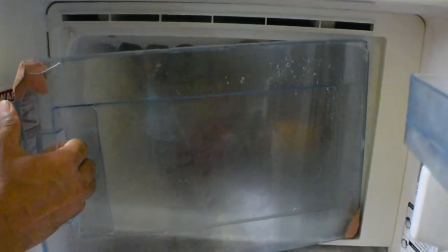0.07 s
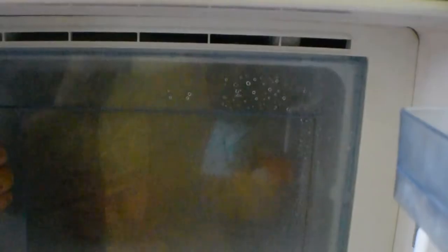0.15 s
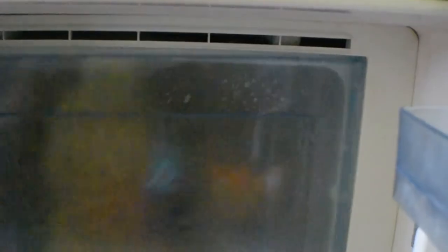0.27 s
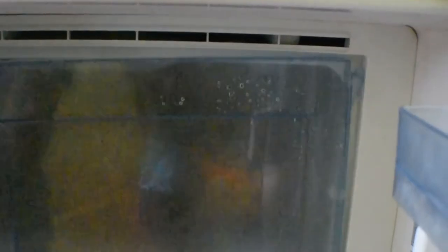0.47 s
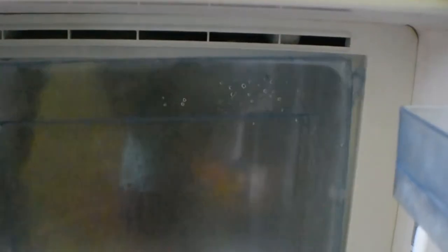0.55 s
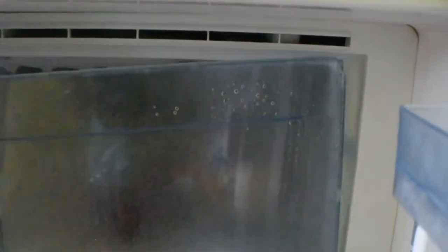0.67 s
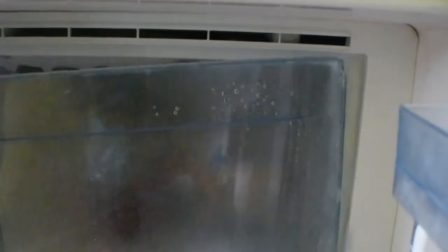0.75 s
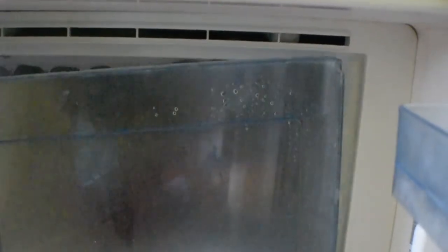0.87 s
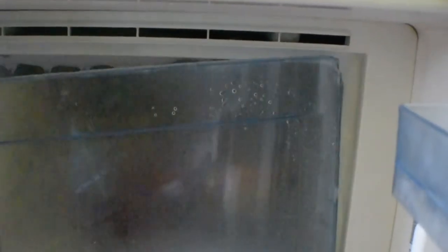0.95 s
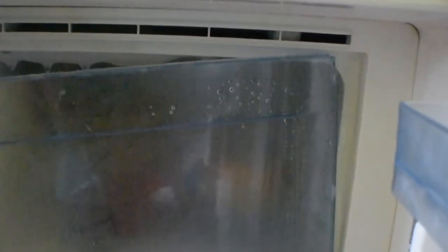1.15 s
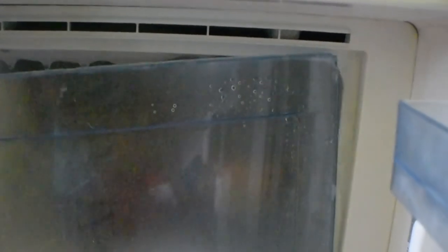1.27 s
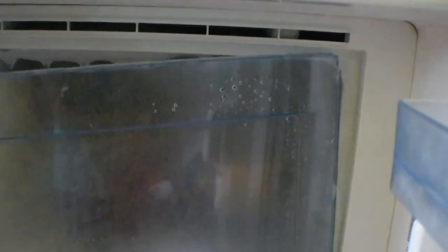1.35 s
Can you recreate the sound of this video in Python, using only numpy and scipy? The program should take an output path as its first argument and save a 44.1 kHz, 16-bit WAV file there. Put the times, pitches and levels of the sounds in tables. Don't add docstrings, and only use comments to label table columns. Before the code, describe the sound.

A stiff plastic freezer door slams its frame in a clattering burst, rebounds with lighter knocks, a hollow plastic tap and finally a bright metal clink, close to the microphone in a small hard kitchen with faint hum.

```python
import sys
import numpy as np
from scipy import signal
from scipy.io import wavfile
from scipy.ndimage import uniform_filter1d

SR = 44100
rng = np.random.default_rng(int(sys.argv[2]) if len(sys.argv) > 2 else 0)


def to_wav(sig):
    pcm = np.clip(np.atleast_2d(sig), -1, 1) * 32767
    pcm = np.round(pcm).astype(np.int16)
    wavfile.write(sys.argv[1], SR, pcm.T)


def natural_amplitude(level_db):
    exponent = np.asarray(level_db, float) / 20
    return 10 ** exponent


N = 61739
LEAD = 4410
LN_1000 = np.log(1000)
SIDES = np.array([[1], [-1]])


def curve(table, hz):
    table = np.array(table, float)
    return np.interp(np.log(hz), np.log(table[:, 0]), table[:, 1])


def band(x, hz, width):
    return signal.lfilter(*signal.iirpeak(min(hz, .44 * SR), 1 / max(width, .01), fs=SR), x)


def high_pass(x, order, hz):
    return signal.sosfilt(signal.butter(order, hz, "high", fs=SR, output="sos"), x)


def unit(x):
    return x / np.sqrt(np.mean(x ** 2))


def add(out, x, s):
    i = LEAD + int(s * SR)
    x = x[:len(out) - i]
    out[i:i + len(x)] += x


def rattle(ms):
    if ms == 0:
        return np.ones(1)
    attack_ms = min(0.97, ms)
    t_ms = np.arange(SR // 15) / SR * 1000
    grit = rng.standard_normal(len(t_ms)) * np.sqrt(rng.exponential(size=len(t_ms)))
    return grit * (1 - np.exp(-t_ms / attack_ms)) ** 2 * np.exp(-t_ms / max(ms, .1))


def ring(x, modes, damp=0.6, rough=0.):
    scatter_db, rough_ms, rise_ms = 1.5, 6, 1.5
    t = np.arange(SR // 3)[:, None] / SR
    hz, db, t60 = np.array(modes, float).T
    level_chance, pitch_chance = rng.standard_normal((len(modes), 2)).T
    phase = 2 * np.pi * hz * (1 + pitch_chance / 2000) * t
    tone = np.sin(phase)
    if rough:
        k = int(rough_ms * SR / 1000)
        noise = rng.standard_normal((2, len(t), len(hz)))
        wobble = uniform_filter1d(noise, size=k, axis=1) * np.sqrt(k) * rough
        tone = tone * (1 + wobble[0]) + np.cos(phase) * wobble[1]
        tone = tone * (1 - np.exp(-t * 1000 / rise_ms))
    decay = np.exp(-LN_1000 * t / (t60 * damp))
    response = (tone * decay) @ natural_amplitude(db + scatter_db * level_chance)
    y = signal.fftconvolve(x, response)
    return y / np.sqrt(np.max(uniform_filter1d(y ** 2, size=200)))


def struck(hits, modes, rough=0., push=False):
    out = np.zeros(N + LEAD)
    for s, db, ms in hits:
        hit = rattle(ms)
        if push:
            hit = np.abs(hit)
        add(out, natural_amplitude(db) * ring(hit, modes, rough=rough), s)
    return out


def clinks(hits, pitches, modes):
    return struck(hits, [(hz, *m) for hz, m in zip(pitches, modes)], rough=.5)


# [f/Hz, side/dB]
ROOM_SIDE = [(40, -18), (130, -32), (400, -20), (1500, -14), (5000, -9), (12000, -2)]


def bands(count, size):
    for hz in 30 * 2 ** (np.arange(count) / 2):
        mid, side = (unit(band(band(rng.standard_normal(size), hz, 0.63), hz, 0.63)) for _ in range(2))
        yield hz, mid + natural_amplitude(curve(ROOM_SIDE, hz)) * side * SIDES


# [f/Hz, level/dB per Hz]
HUM = [(30, -20), (150, -18.5), (300, -20.5), (550, 2.5), (1150, -12), (2000, -20), (9000, -34.5),
       (13000, -63)]


def hum():
    level_db, flicker_db = -43, 2
    out = 0
    for hz, noise in bands(count=19, size=N):
        walk = uniform_filter1d(rng.standard_normal(N), size=2000)
        walk = unit(uniform_filter1d(walk, size=2000))
        out = out + noise * natural_amplitude(curve(HUM, hz) + flicker_db * walk) * np.sqrt(hz)
    return unit(out) * natural_amplitude(level_db)


# [t/s, level/dB,
# contact f/Hz, rattle/ms, panel ring/dB]
CONTACTS = [(-.03, -30.5, 2020, 7.2, 2), (0.013, -39.5, 1540, 7.3, -5), (0.071, -44, 1400, 15, 1.5),
            (0.214, -38, 6130, 8.4, 3), (0.2207, -22, 1400, 11, -4), (0.2327, -12, 2200, 11.4, 0),
            (0.2456, -11.5, 950, 9.7, 1), (0.251, -7, 1220, 23, -2.5), (0.257, -4.5, 1990, 5, -4),
            (.264, -9.5, 1410, 3.4, -1.5), (0.2739, -26.5, 1110, 2.1, 13.5), (.279, -13, 910, 18, -11),
            (0.31, -31.5, 9000, 2.3, -8),
            (0.38, -30, 3000, 18, -23), (.387, -24, 1750, 2.2, -2), (.391, -23, 790, 10, -31),
            (0.4013, -12, 2120, 8.1, -29), (0.509, -35, 1490, 3.3, 4.5), (.552, -42, 1830, 13, 11.5),
            (.59, -27.5, 1760, 9.7, -19), (.621, -36, 1119, 16, 4), (.662, -44, 6000, 2, 15.5),
            (.672, -24, 1670, 7.8, -8.5), (0.693, -25, 1530, 15, -17), (0.704, -32, 3500, 6.1, -6),
            (0.7284, -20.5, 3400, 6.7, -8.5), (0.867, -49.5, 920, 17, 9.5), (0.944, -50, 2500, 4, 6),
            (1.1088, -18, 8440, 1.5, -24), (1.1148, -21.5, 10500, 20.5, -49)]
# [f/Hz, level/dB, t60/s]
PANEL = [(269, -4.5, 0.14), (332.4, -10.5, 0.29), (466.6, -13, 0.37), (654.9, -1.5, 0.2), (768, -7, 0.29),
         (840, -2, 0.065), (897, 2, 0.082), (988, -6.5, 0.3), (1106.6, -5.5, 0.31), (1241, 6.5, 0.071),
         (1316, 0.5, 0.17), (1428, 3, 0.097), (1632, -3.5, .1), (1989, -6.5, 0.12)]


def door():
    hard_db, leak_hard_db, leak_soft_db = -13, -6, -24
    contact_width, contact_top, light_cut_hz = 0.5, 4.41, 380
    panel_damp, panel_rough = 0.53, .4
    out = np.zeros(N + LEAD)
    for s, db, hz, ms, ring_db in CONTACTS:
        hard = db > hard_db
        hit = rattle(ms)
        crack = band(hit, hz, contact_width)
        soft = signal.lfilter(*signal.butter(2, min(contact_top * hz, .4 * SR), fs=SR), crack)
        crack = soft + natural_amplitude(leak_hard_db if hard else leak_soft_db) * crack
        peak = np.sqrt(np.max(uniform_filter1d(crack ** 2, size=100)))
        add(out, natural_amplitude(db) * crack / peak, s)
        body = ring(hit, PANEL, panel_damp, panel_rough * hard)
        if not hard:
            body = high_pass(body, 2, light_cut_hz)
        add(out, natural_amplitude(db + ring_db) * body, s)
    return out


# [t/s, level/dB, rattle/ms]
CLINKS_B = [
    (-.03, -37, 0),
    (.02, -44, 0.0054),
    (.045, -43.5, 0.037),
    (.385, -38, 0.0094),
    (.662, -49, 0.0036),
    (.7285, -31.5, 0.025),
]
METAL_B_HZ = [3144, 3105, 8230, 8370, 9780, 14200]
# [level/dB, t60/s]
METAL_B = [(5, .25), (-3, 0.4), (11.5, 0.089), (2, 0.28), (-7, 0.22), (-22, 0.088)]


def early_clinks():
    return clinks(CLINKS_B, METAL_B_HZ, METAL_B)


# [f/Hz, t60/s]
ROOM_T60 = [(100, .5), (400, 0.78), (1500, 0.69), (5000, 0.2641), (12000, 0.46)]
# [f/Hz, level/dB]
ROOM_DB = [(100, -12), (400, -7), (1500, -9.5), (5000, -3), (12000, -8), (15000, -24)]


def room(x):
    rise_ms = 1.4
    t = np.arange(SR * 3 // 4) / SR
    echo = 0
    for hz, noise in bands(count=19, size=len(t)):
        t60 = curve(ROOM_T60, hz)
        level = natural_amplitude(curve(ROOM_DB, hz)) * np.sqrt(hz / t60) / SR * 4
        echo = echo + noise * np.exp(-LN_1000 * t / t60) * level
    echo = echo * (1 - np.exp(-t * 1000 / rise_ms))
    return signal.fftconvolve(x[None], echo, axes=1)[:, :len(x)]


# [t/s, level/dB, push/ms]
THUDS = [
    (.246, -27.5, 1.2),
    (.267, -23, 1.5),
    (.335, -40, 3),
    (.875, -55, 3.6),
]
# [f/Hz, level/dB, t60/s]
CABINET = [(45, -31, .05), (79.4, -29, .08), (115.5, 3, 0.5), (150, 15, 0.21), (203, -29, .1),
           (263, -3, 0.19)]


def thuds():
    return struck(THUDS, CABINET, push=True)


# [t/s, level/dB, rattle/ms]
TAPS = [
    (.7225, -22, 2.4),
    (.726, -15, 2.3),
    (.7285, -15, 1.25),
]
# [f/Hz, level/dB, t60/s]
BOX = [(1444, 1.5, 0.027), (1544, 5, 0.015), (1667, -6, 0.046), (2200, -6.5, 0.01), (2500, -5, 0.014),
       (2990, -21, 0.0061), (3310, -23, .012), (3600, -4, 0.018)]


def box_taps():
    return signal.lfilter(*signal.butter(2, 560, "high", fs=SR), struck(TAPS, BOX, rough=.8))


# [t/s, level/dB, rattle/ms]
CLINKS_A = [
    (1.1085, -21, 0.00064),
    (1.1155, -14, 0.0043),
    (1.129, -20, 0),
    (1.146, -29, 0),
]
METAL_A_HZ = [8078, 8205, 8323, 8581, 9400, 9785, 9928, 10720, 11000, 11330, 14110]
# [level/dB, t60/s]
METAL_A = [(-2.5, 0.36), (11, 0.073), (-17, 0.18), (-6, 0.088), (-5, 0.081), (4, 0.17), (-21, .06),
           (-6, 0.042), (-8, 0.074), (-21, 0.039), (-13, 0.087)]


def late_clinks():
    return clinks(CLINKS_A, METAL_A_HZ, METAL_A)


# [t/s, level/dB, rattle/ms]
ROCKS = [
    (1.1095, -28.5, 0.0022),
    (1.129, -25.5, 0),
    (1.146, -27, 0),
    (1.237, -47.5, 0.0094),
]
# [f/Hz, level/dB, t60/s]
METAL_LOW = [(3103, 0, .3), (3160, -1, .25), (3125, -8, .8)]


def rocks():
    return struck(ROCKS, METAL_LOW, rough=.25)


def near_walls(dry, left):
    near_db, side_db, side_hz, left_db = 2.5, -3.5, 9000, -20
    bounce = rng.standard_normal(40) / np.sqrt(40)
    treble = signal.lfilter(*signal.butter(1, side_hz, "high", fs=SR), signal.lfilter(bounce, 1, dry))
    side = natural_amplitude(side_db) * treble + natural_amplitude(left_db) * left
    return natural_amplitude(near_db) * (dry + side * SIDES)


def scene():
    low_cut_hz, pan_db = 102, 0.13
    left = late_clinks() + rocks()
    dry = door() + early_clinks() + box_taps() + left
    dry = high_pass(dry, 4, low_cut_hz) + thuds()
    pan = natural_amplitude(pan_db * SIDES / 2)
    return ((near_walls(dry, left) + room(dry)) * pan)[:, LEAD:] + hum()


def low_pass(x):
    return signal.sosfilt(signal.butter(12, 16150, fs=SR, output="sos"), x)


def record(dry):
    duck_s, duck_ramp_s, before_duck_db = .153, .002, 5
    drive_db, top_hz, offset = -1.5, 15700, -0.0033
    t = np.arange(N) / SR
    x = dry * natural_amplitude(drive_db + before_duck_db * np.clip((duck_s - t) / duck_ramp_s, 0, 1))
    x = signal.sosfilt(signal.ellip(8, .2, 60, top_hz, fs=SR, output="sos"), x) + offset
    return low_pass(np.clip(x, -1, 1))


dry = scene()
out = record(dry)
to_wav(out)
```